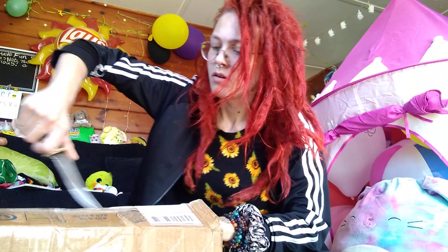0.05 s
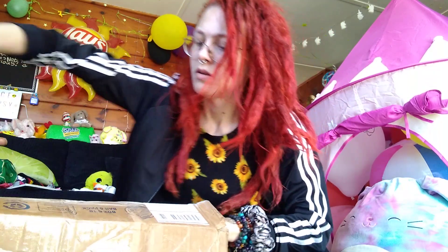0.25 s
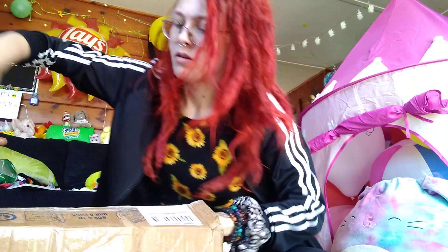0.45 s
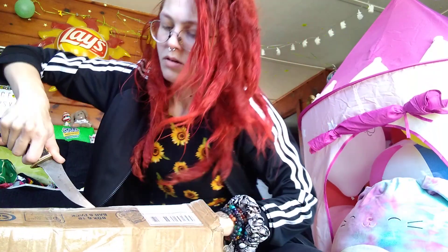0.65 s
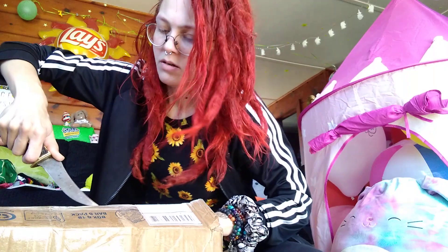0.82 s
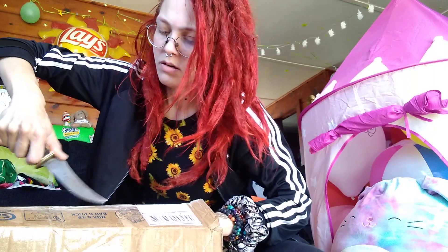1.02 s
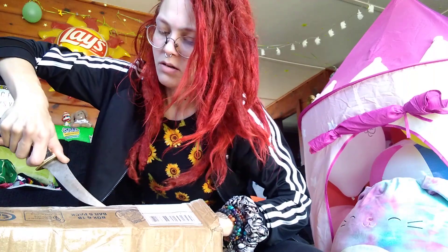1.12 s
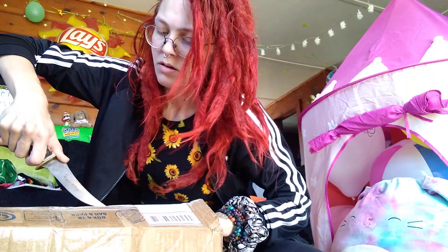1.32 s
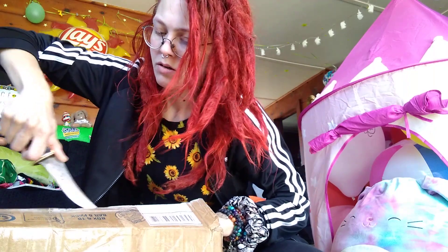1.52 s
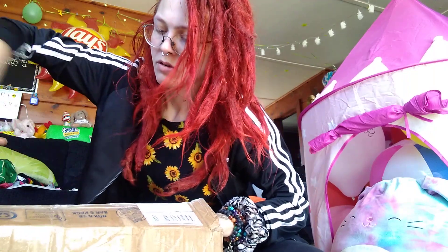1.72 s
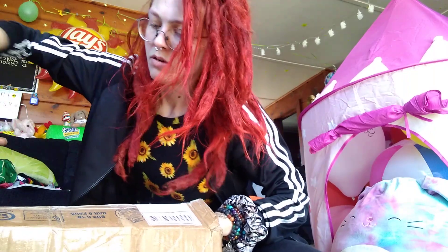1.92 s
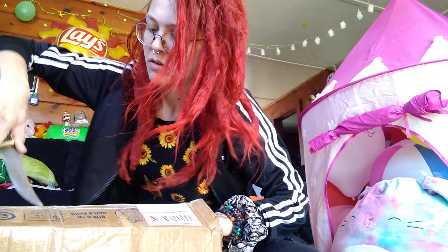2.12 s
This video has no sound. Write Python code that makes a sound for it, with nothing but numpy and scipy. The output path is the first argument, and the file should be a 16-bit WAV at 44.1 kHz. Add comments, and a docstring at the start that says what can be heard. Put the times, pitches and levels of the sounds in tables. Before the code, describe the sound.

A knife cuts a taped cardboard box, close and in stereo. At 0.2-0.4 s a bright, gritty rip makes the hollow box knock and judder, ending in crisp tape ticks. Until 1.6 s only soft taps, small ticks and faint bird whistles over low room hum. Low bumps and left-sided air rumble lead to a second rip around 1.75-1.9 s with a strong thump, then ticks, a very faint blade ring and chirps.

```python
"""Knife along a taped cardboard box

Two knife strokes tear a taped seam near a stereo microphone: dense noise grains, with a fizzier top for the tape.
The grains and separate knocks ring the hollow box's modes; its flaps judder as short gliding tones.
Noise bursts make tape ticks, narrow noise the blade's faint singing, and low band noise the box shifting.
Behind: gliding bird whistles outside, a draught rumbling mostly on the left port, and room hum."""
import sys
import numpy as np
from scipy import signal
from scipy.fft import rfft, irfft
from scipy.io import wavfile
from scipy.ndimage import uniform_filter1d

SR = 44100
rng = np.random.default_rng(int(sys.argv[2]) if len(sys.argv) > 2 else 0)


def wav_out(sig):
    """Save sig, one row per channel (or a flat mono array), as 16-bit PCM at SR to the path in sys.argv[1]."""
    wavfile.write(sys.argv[1], SR, np.round(np.clip(np.atleast_2d(sig).T, -1, 1) * 32767).astype(np.int16))


N = 94815  # samples


def amp(db):
    """Decibels to linear gain."""
    return 10 ** (np.asarray(db) / 20)


def rms_one(x):
    """Scales a signal to an rms of 1."""
    return x / np.sqrt(np.mean(x ** 2) + 1e-20)


def curve(rows, column):
    """Gain drawn between the dB points of a column, down at -140 dB outside its span."""
    rows = np.array(rows)
    level_db = np.interp(np.arange(N) / SR, rows[:, 0], rows[:, column], left=-140, right=-140)
    return amp(level_db)


def at_hz(points, hz):
    """Reads a table of (Hz, value) along a logarithmic frequency axis."""
    points = np.array(points)
    return np.interp(np.log(hz), np.log(points[:, 0]), points[:, 1])


def bin_hz():
    """Frequencies of the spectrum bins, kept above zero for the logarithm."""
    return np.maximum(np.fft.rfftfreq(N, 1 / SR), 1)


def filt(x, hz, kind, order=2):
    """Butterworth filter."""
    return signal.sosfilt(signal.butter(order, hz, kind, fs=SR, output="sos"), x)


def drift(hz, size=N):
    """Smooth random wandering slower than hz, rms 1."""
    settle = 4000  # samples dropped while the filter starts
    return rms_one(filt(rng.standard_normal(size + settle), hz, "low")[settle:])


def colour(x, spectrum):
    """Shapes noise with a table of levels over frequency; rms 1."""
    return rms_one(irfft(rfft(x) * amp(at_hz(spectrum, bin_hz())), N))


def ring(x, hz, t60):
    """Two-pole resonator whose ring falls 60 dB in t60 seconds."""
    radius = amp(-60 / (t60 * SR))
    angle = 2 * np.pi * hz / SR
    return signal.lfilter([.5, 0, -.5], [1, -2 * radius * np.cos(angle), radius ** 2], x + 1e-18)


def add(out, start_s, x):
    """Mixes a sound in at its start time, cut off at the end of the scene."""
    i = int(start_s * SR)
    out[..., i:i + x.shape[-1]] += x[..., :N - i]


SLIPS_PER_S, SLIP_SPREAD_DB = 6000, 5
SNAPS_PER_S, SNAP_DB = 83, 9  # the rarer loud slips and their boost
CLUMP_DB = 2.5  # unevenness of the tear


def slips():
    """Stick-slip of the blade: dense random impulses of uneven size, with rarer loud snaps; rms 1."""
    size = amp(SLIP_SPREAD_DB * np.minimum(rng.exponential(1, N), 4))
    sign = rng.choice([-1, 1], N)
    draw = rng.random(N) * SR
    snap = np.where(draw < SNAPS_PER_S, amp(SNAP_DB), 1)
    clumps = amp(CLUMP_DB * drift(84))
    return rms_one(clumps * size * sign * (draw < SLIPS_PER_S) * snap)


def stereo_slips(likeness):
    """Slips that the two ports share in part."""
    alike = np.clip(likeness, 0, 1)
    return np.sqrt(alike) * slips() + np.sqrt(1 - alike) * np.array([slips(), slips()])


# The two knife strokes, one list of points each, drawing how hard the blade tears and rubs.
# Each row: time in seconds, tearing in dB, top fizz in dB, drive of the box in dB (before RUB_DB).
KNIFE_STROKES = [
    [(0.14, -101, -100, -82), (0.168, -63, -61, -66), (0.186, -70, -67, -67.5), (0.2, -53.5, -49.5, -53.5),
     (0.216, -63, -50.5, -49.5), (0.242, -53, -43, -41), (0.252, -46, -44.5, -36), (0.268, -40.5, -40, -38),
     (0.3, -46, -45, -34.5), (0.338, -50.5, -46.5, -54), (0.354, -58.5, -53, -60.5),
     (0.374, -63.5, -55, -67), (0.408, -79, -72, -80.5), (0.45, -80, -94, -72)],
    [(1.45, -73, -74, -101), (1.51, -73.5, -76, -69.5), (1.568, -75, -73.5, -73.5),
     (1.648, -65.5, -66, -61.5), (1.654, -61, -54, -70), (1.674, -65.5, -63, -67), (1.742, -61.5, -56, -61),
     (1.752, -60, -50.5, -54), (1.772, -56, -54.5, -56.5), (1.788, -50.5, -45, -45),
     (1.852, -41.5, -36.5, -33.5), (1.888, -56, -53.5, -50), (1.956, -66, -73, -74), (1.99, -76, -80, -76),
     (2.15, -67, -82, -69.5)],
]
# Tone of the parting fibres. Each row: frequency in Hz, relative level in dB per Hz.
TEAR_SPECTRUM = [(880, -16), (1500, -10), (1900, -1), (2860, 0.5), (3130, -3), (3880, -1), (6520, -13),
                 (11000, -7.5), (15600, -10.5)]
FIZZ_FROM_HZ, TEAR_LIKENESS = 7750, 0.24  # likeness: share of slip power common to both ports


def tearing():
    """Fibres part in bright grains, with the higher fizz of the tape following its own level."""
    grain = colour(filt(stereo_slips(TEAR_LIKENESS), 1100, "high"), TEAR_SPECTRUM)
    fibres = rms_one(filt(grain, FIZZ_FROM_HZ, "low", order=4))
    fizz = rms_one(filt(grain, FIZZ_FROM_HZ, "high", order=6))
    tear_gain = sum(curve(stroke, 1) for stroke in KNIFE_STROKES)
    fizz_gain = sum(curve(stroke, 2) for stroke in KNIFE_STROKES)
    return fibres * tear_gain + fizz * fizz_gain


# Modes of the hollow box.
# Each row: frequency in Hz, relative level in dB, undamped ring time to -60 dB in seconds.
BOX_MODES = [(107, 4, 0.029), (159, 0.5, 0.041), (240, 16, 0.084), (329, 3.5, 0.046), (410.5, 14, 0.13),
             (526.5, 12, 0.1), (630, 0, 0.029), (923, 8.5, 0.036), (1100, 1.5, 0.11), (1183, 0.5, 0.081),
             (1291, -38, 0.069), (2210, -2.5, 0.028)]
HAND_DAMPING = .55  # share of the ring time left under the hand
RUB_DB, RUB_LIKENESS = 6.5, 0.8


def box_rub():
    """The blade's slips keep the hand-damped modes of the box ringing through each stroke."""
    drives = stereo_slips(RUB_LIKENESS), stereo_slips(RUB_LIKENESS)
    rub = 0
    for k, (hz, db, t60) in enumerate(BOX_MODES):
        # neighbouring modes take different drives and opposite signs
        mode = ring(drives[k % 2], hz, HAND_DAMPING * t60) * (-1) ** k
        rub = rub + amp(db) / np.sqrt(t60) * mode
    return amp(RUB_DB) * rms_one(rub) * sum(curve(stroke, 3) for stroke in KNIFE_STROKES)


# Knocks and soft taps on the box.
# Each row: time in seconds, strike level in dB (before the trims below), centre of the modes it reaches in Hz.
BOX_KNOCKS = [(0.167, -50, 503), (.172, -35.5, 170), (0.203, -36, 500), (0.222, -31.5, 260),
              (0.2504, -27.5, 926), (.272, -27, 171), (0.523, -52.5, 920), (.756, -43, 167),
              (0.779, -52, 90), (.952, -47, 74), (1.0199, -48, 264), (1.138, -49.5, 277),
              (1.2248, -37.5, 279), (1.503, -55, 387), (1.632, -28.5, 111), (1.653, -49.5, 1190),
              (1.664, -34, 124), (1.751, -46, 1200), (1.7921, -31, 860), (1.796, -29, 86),
              (1.805, -43, 1120), (1.817, -32, 1180), (1.821, -20.5, 111), (1.853, -37, 990),
              (2.001, -40.5, 142)]
KNOCK_DB, KNOCK_REACH_DB_PER_OCT = -1, 13.0  # trim, and loss away from the centre
THUD_DB, THUD_CYCLES, THUD_REACH = 3, 6, 4  # trim, cycles to -60 dB, low-pass as a multiple of the centre


def box_knocks():
    """Each impulse rings mostly the box modes near its centre."""
    start_s, level_db, centre_hz = np.transpose(BOX_KNOCKS)
    knocks = 0
    for hz, _, t60 in BOX_MODES:
        octaves_away = abs(np.log2(hz / centre_hz))
        hits = np.zeros(N)
        hits[(start_s * SR).astype(int)] = amp(level_db + KNOCK_DB - KNOCK_REACH_DB_PER_OCT * octaves_away)
        knocks = knocks + filt(ring(hits, hz, HAND_DAMPING * t60), 1.3 * hz, "low", order=3)
    return knocks


def knock_thuds():
    """The dull contact that starts each knock: a low-passed cosine dying within a few cycles."""
    out, t = np.zeros(N), np.arange(4000) / SR
    for start_s, db, hz in BOX_KNOCKS:
        decay = amp(db + THUD_DB - 60 * t * hz / THUD_CYCLES)
        thud = -decay * np.cos(2 * np.pi * hz * t)
        add(out, start_s, filt(thud, THUD_REACH * hz, "low"))
    return out


# Short gliding tones of the box: the first two rows are knocks ringing the box near 240 Hz, the rest are flaps
# juddering against the blade. # Each row: start in seconds, length in seconds, start pitch in Hz, end pitch in
# Hz, # level in dB, share of the length spent swelling.
FLAP_JUDDERS = [(0.248, 0.009, 254, 235, -9, 0.35), (0.2582, 0.011, 231, 206, -16, 0.42),
                (0.278, 0.041, 407.6, 425.4, -18, 0.37), (1.76, 0.089, 257.4, 240, -35.5, 0.14),
                (1.783, 0.0513, 250, 197.7, -19, 0.26), (1.830, 0.0303, 413, 486, -15, 0.905),
                (1.862, 0.052, 487, 471, -34.5, 0.11)]
JUDDER_OVERTONE_DB, JUDDER_WAVER, JUDDER_FLUTTER_DB = -17, .018, 1.5  # waver as a share of the pitch


def judders():
    """A knock on the box, or a flap caught by the blade, sounds at its own gliding pitch, swells and is
    stopped."""
    out = np.zeros(N)
    for start_s, length_s, hz0, hz1, db, rise in FLAP_JUDDERS:
        u = np.linspace(0, 1, int(length_s * SR))
        pitch = (hz0 + (hz1 - hz0) * u) * (1 + JUDDER_WAVER * drift(118, len(u)))
        phase = 2 * np.pi * np.cumsum(pitch) / SR
        swell = np.interp(u, [0, np.clip(rise, .05, .95), 1], [0, 1, 0]) ** 0.7
        flutter = amp(JUDDER_FLUTTER_DB * drift(112, len(u)))
        tone = np.sin(phase) + amp(JUDDER_OVERTONE_DB) * np.cos(2 * phase)
        add(out, start_s, amp(db) * swell * flutter * tone)
    return out


# Low rumble of the box shifting. Each row: time in seconds, level in dB (before SHIFT_DB).
SHIFT_LEVELS = [(0.0, -62.5), (0.14, -67.5), (0.262, -30), (0.354, -63), (0.382, -50), (0.416, -64),
                (0.778, -58.5), (0.826, -69), (0.904, -69), (0.952, -59), (1.222, -65.5), (1.244, -48),
                (1.308, -65.5), (1.45, -62.5)]
SHIFT_DB = -1.0


def box_shifting():
    """Low rumble of the box shifting: evened band noise on a drawn level."""
    low = rms_one(filt(rng.standard_normal(N), [45, 135], "band"))
    even = low / np.sqrt(uniform_filter1d(low ** 2, 2000))
    return even * curve(SHIFT_LEVELS, 1) * amp(SHIFT_DB)


# Ticks of the tape.
# Each row: start in seconds, level in dB (before TICK_DB), lowest Hz, highest Hz,
# left-right balance in dB (positive is left), fizz after it in dB relative to the crack.
TAPE_TICKS = [(0.041, -55.5, 4960, 14100, -6, -32), (0.263, -33, 8000, 15000, 4, -20),
              (.2715, -49, 1500, 12000, 2, -25), (0.311, -43, 5000, 14900, 0, -18),
              (0.3214, -28, 6000, 15000, 3, -24), (0.336, -29, 8300, 15400, -4, -9),
              (0.362, -42.5, 5800, 14100, -3, -5), (.371, -37.5, 8260, 16300, -10, -25),
              (.382, -45, 5900, 14100, 6, -20), (0.402, -49.5, 4060, 7960, -6, -17),
              (.432, -54.5, 3300, 12100, -1, -9), (.624, -54, 9300, 16800, 5, -11),
              (0.6936, -46, 3170, 16600, -1.5, -13), (0.762, -60, 5000, 16100, -3, -3),
              (0.775, -55, 7260, 16100, 2, 0), (0.783, -53, 600, 9900, -1, -3),
              (0.929, -45.5, 2270, 17200, 2, -4), (0.985, -52, 4950, 16000, -1, -22),
              (1.127, -45, 600, 12700, 0.5, -8.5), (1.656, -43, 2020, 15000, -1.5, -3),
              (1.748, -48, 2010, 14560, -2, 0.5), (1.853, -26.5, 2970, 15300, -3.5, -18),
              (1.905, -38.5, 6200, 14400, 3, -31), (1.961, -47.5, 4970, 16100, -1, -14),
              (2.012, -58, 3440, 15700, 1, -2), (2.092, -39.5, 8100, 17700, 2, -19)]
TICK_DB, TICK_EDGE_DB, TICK_FLUTTER_DB = -2.0, 9, 1.5
TICK_T60_S, TICK_TAIL_T60_S, TICK_TAIL_HZ = 0.01, 0.12, 12000


def ticks():
    """Tape lets go: a click and short noise crack, then a duller crackling fizz, all in one band."""
    out, t = np.zeros((2, N)), np.arange(4000) / SR
    for start_s, db, low_hz, high_hz, pan_db, fizz_db in TAPE_TICKS:
        fizz_gain = amp(fizz_db - 60 * t / TICK_TAIL_T60_S + TICK_FLUTTER_DB * drift(110, len(t)))
        fizz = fizz_gain * rng.standard_normal((2, len(t)))
        crack = amp(-60 * t / TICK_T60_S) * rng.standard_normal((2, len(t)))
        click = amp(TICK_EDGE_DB) * (t == 0)
        burst = crack + click + filt(fizz, TICK_TAIL_HZ, "low", order=1)
        tick = filt(burst, [low_hz, min(high_hz, .45 * SR)], "band", order=3)
        add(out, start_s, amp(db + TICK_DB + np.array([[.5], [-.5]]) * pan_db) * tick)
    return out


BLADE_S, BLADE_HZ, BLADE_DB = 1.87, 2130, -68
BLADE_T60_S, BLADE_GRAIN_T60_S = 3.5, .016  # slow fade, and the short ring that makes it breathy


def blade():
    """The blade sings faintly after leaving the seam: noise through two resonators, slowly fading."""
    out, t = np.zeros(N), np.arange(N) / SR
    ringing = ring(rng.standard_normal(N), BLADE_HZ, BLADE_GRAIN_T60_S)
    ringing = ring(ringing, BLADE_HZ, BLADE_GRAIN_T60_S)
    add(out, BLADE_S, amp(BLADE_DB - 60 * t / BLADE_T60_S) * rms_one(ringing))
    return out


LEFT_LAG_S, BOX_PAN_DB = 0.00017, -1


def late_left(x):
    """The box lies to the right: the left port hears it later and softer."""
    lag = np.exp(-2j * np.pi * np.fft.rfftfreq(N, 1 / SR) * [[LEFT_LAG_S], [0]])
    return irfft(rfft(x) * lag, N) * amp([[BOX_PAN_DB / 2], [-BOX_PAN_DB / 2]])


# Bird notes.
# Each row: start in seconds, length in seconds, start pitch in Hz, end pitch in Hz,
# level in dB, roughness as random pitch spread in Hz.
BIRD_NOTES = [(0.776, 0.012, 4550, 4380, -61.5, 202), (0.79, 0.023, 3820, 3570, -65, 198),
              (1.074, 0.016, 3260, 3470, -85, 100), (1.135, 0.073, 5000, 4280, -74.5, 480),
              (1.21, 0.032, 3380, 3650, -70, 121), (1.266, 0.053, 4980, 4370, -67.5, 493),
              (1.329, 0.023, 3460, 3720, -64.5, 90), (1.4, 0.065, 4610, 4250, -70.5, 480),
              (1.462, 0.032, 3510, 3640, -66, 90), (1.537, 0.036, 5400, 4750, -64.5, 510),
              (1.559, 0.047, 4740, 4800, -60.5, 159), (1.606, 0.0252, 3470, 3830, -57.5, 69.6),
              (1.684, 0.037, 5120, 5080, -57.5, 201), (1.932, 0.032, 3410, 3860, -61.5, 60.6),
              (2.01, 0.056, 6200, 5980, -66, 250), (2.041, 0.043, 5470, 5220, -63, 212),
              (2.115, 0.04, 3370, 3820, -59, 70)]


def bird():
    """Short gliding whistles, roughened by fast random pitch drawn separately for each side."""
    out = np.zeros((2, N))
    for start_s, length_s, hz0, hz1, db, rough_hz in BIRD_NOTES:
        u = np.linspace(0, 1, int(length_s * SR))
        for side in out:
            pitch = hz0 + (hz1 - hz0) * u + rough_hz * drift(270, len(u))
            phase = 2 * np.pi * np.cumsum(pitch) / SR + 2 * np.pi * rng.random()
            add(side, start_s, amp(db) * np.sin(np.pi * u) * np.sin(phase))
    return out


# Push of the draught on the microphone, before the port gains below.
# Each row: time in seconds, low rumble in dB, buffeting above it in dB.
DRAUGHT_LEVELS = [(1.422, -61.5, -77), (1.466, -39, -81), (1.554, -39, -91), (1.606, -44, -66),
                  (1.632, -27, -46.5), (1.648, -30, -48), (1.688, -51, -52), (1.71, -31.5, -63),
                  (1.768, -57, -73), (1.814, -28.5, -45), (1.832, -29, -47), (1.886, -40.5, -73),
                  (1.984, -49.5, -83), (1.996, -38.5, -61), (2.15, -35.5, -61)]
DRAUGHT_HZ, DRAUGHT_LEFT_DB, DRAUGHT_RIGHT_DB = 94.6, 0.5, -19


def draught():
    """Air pushing on the ports: lumpy low noise and buffeting, nearly all on the left."""
    low = filt(rng.standard_normal((2, N)), DRAUGHT_HZ, "low", order=3)
    low = rms_one(filt(low, 48.5, "high"))
    low = low / np.sqrt(uniform_filter1d(low ** 2, 1500))  # evened out, so the table sets the lumps
    buffet = rms_one(filt(rng.standard_normal((2, N)), [120, 300], "band"))
    both = low * curve(DRAUGHT_LEVELS, 1) + buffet * curve(DRAUGHT_LEVELS, 2)
    return both * amp([[DRAUGHT_LEFT_DB], [DRAUGHT_RIGHT_DB]])


# Tone of the room hum. Each row: frequency in Hz, relative level in dB per Hz.
HUM_SPECTRUM = [(76, -12.5), (130, -6), (268, -7), (335, -17), (418, -10), (532, -10), (780, -20.5),
                (1100, -21), (1680, -24.5), (3530, -28.5), (7750, -38), (15100, -32.5), (16000, -41)]
# How alike the hum is on both sides. Each row: frequency in Hz, left-right likeness (1 is identical).
HUM_LIKENESS = [(60, 0.31), (180, 0.91), (550, 0.58), (1650, -0.25), (4970, 0.077), (15000, -0.034)]
HUM_DB, HUM_WAVER_DB = -65, 1.2


def hum():
    """Steady room tone: coloured noise, most alike on both sides in the bass, wavering slightly."""
    alike = np.clip(at_hz(HUM_LIKENESS, bin_hz()), -1, 1)
    mid, side = rfft(rng.standard_normal((2, N)))
    spread = np.sqrt(1 - alike) * side * np.array([[1], [-1]])
    both = irfft(np.sqrt(1 + alike) * mid + spread, N)
    return amp(HUM_DB + HUM_WAVER_DB * drift(7)) * colour(both, HUM_SPECTRUM)


ROOM_DB, ROOM_T60_S = -19.5, 0.17
BIRD_ECHO_DB, BIRD_ECHO_T60_S = -8, .12


def room(x, db, t60):
    """A soft reverberation: convolution with decaying noise, its own on each side."""
    t = np.arange(int(.4 * SR)) / SR
    tail = rng.standard_normal((2, len(t))) * amp(-60 * t / t60) * (t > .004)
    tail = tail / np.sqrt(np.sum(tail ** 2) / 2)
    return amp(db) * signal.fftconvolve(x, tail, axes=1)[:, :N]


def scene():
    """Knife, box and tape up close, with the bird and the room behind."""
    box = box_rub() + box_knocks() + knock_thuds()
    near = late_left(box + judders() + blade() + tearing()) + ticks()
    near = near + room(near, ROOM_DB, ROOM_T60_S)
    song = bird()
    song = song + room(song, BIRD_ECHO_DB, BIRD_ECHO_T60_S)
    return near + box_shifting() + song + draught() + hum()


CUTOFF_HZ = 16600  # fully cut from here up, by 60 dB


def record(dry):
    """Deep bass rolls off, the top is cut steeply."""
    no_deep_bass = filt(dry, 46, "high", order=4)
    return signal.sosfilt(signal.cheby2(16, 60, CUTOFF_HZ, fs=SR, output="sos"), no_deep_bass)


dry = scene()
out = record(dry)
wav_out(out)
```